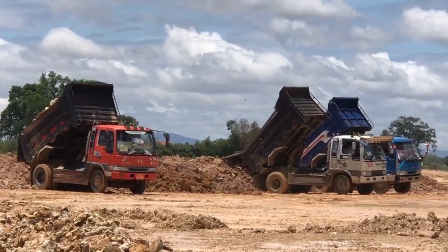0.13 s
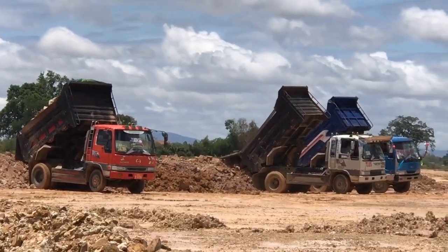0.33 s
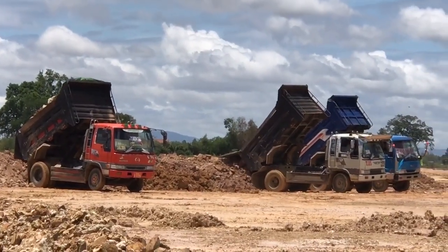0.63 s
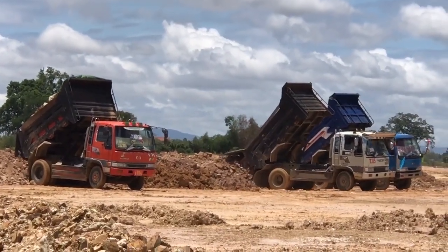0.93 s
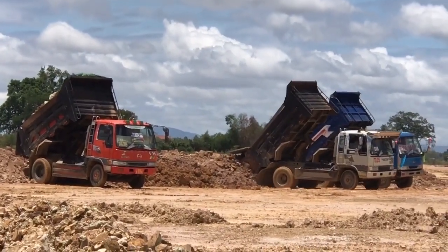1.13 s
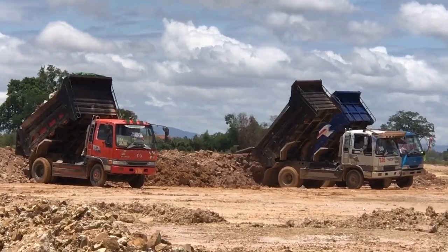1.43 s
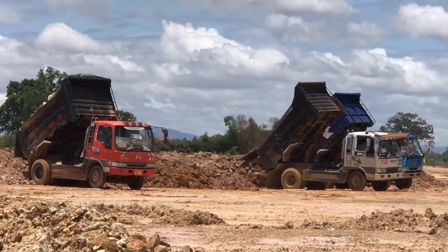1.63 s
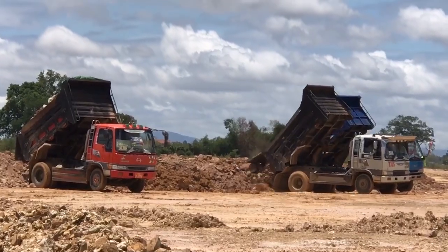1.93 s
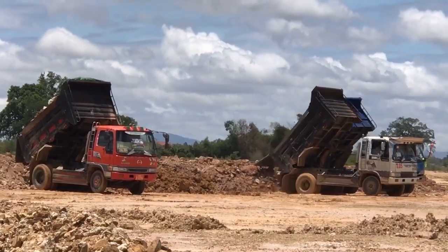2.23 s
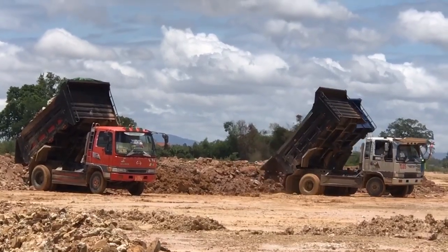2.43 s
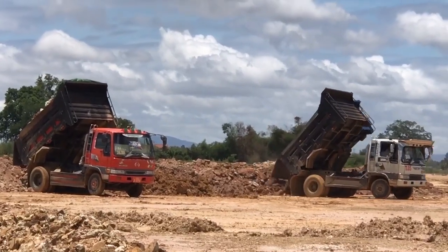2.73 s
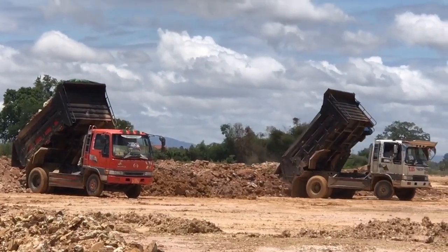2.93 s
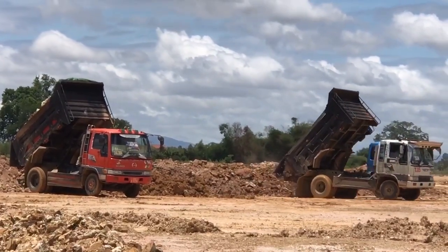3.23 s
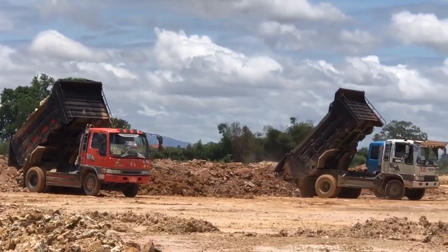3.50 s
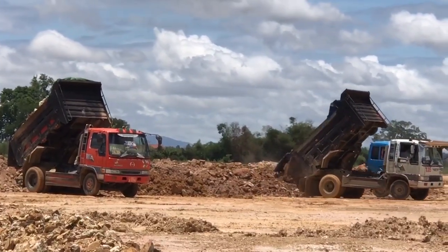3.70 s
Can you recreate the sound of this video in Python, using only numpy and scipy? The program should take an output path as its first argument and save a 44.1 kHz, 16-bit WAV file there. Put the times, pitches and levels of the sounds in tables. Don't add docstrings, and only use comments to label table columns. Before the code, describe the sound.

Heavy truck engines drone and pull away over dirt, brakes squeak, a steel bed clangs late

```python
import sys
import numpy as np
from scipy import signal
from scipy.fft import rfft, irfft, next_fast_len
from scipy.io import wavfile
from scipy.ndimage import uniform_filter1d

SR = 44100
rng = np.random.default_rng(int(sys.argv[2]) if len(sys.argv) > 2 else 0)


def generate_wav(sig):
    pcm = np.round(np.clip(np.atleast_2d(sig).T, -1, 1) * 32767).astype(np.int16)
    wavfile.write(sys.argv[1], SR, pcm)


def to_linear_factor(level_db):
    exponent = np.asarray(level_db, float) / 20
    return 10 ** exponent


N = 170226


def rms_one(x):
    return x / np.sqrt(np.mean(x ** 2) + 1e-20)


def in_time(rows):
    s, *columns = np.transpose(rows)
    return [np.interp(np.arange(N) / SR, s, c) for c in columns]


def at_hz(points, hz):
    table_hz, value = np.transpose(points)
    return np.interp(np.log(hz), np.log(table_hz), value)


def drift(rate_hz, count=N):
    r = np.exp(-80 * np.pi * rate_hz / SR)
    slow = signal.lfilter([1], [1, -2 * r, r * r], rng.standard_normal(N // 40 + 2002))[2000:]
    return np.interp(np.arange(count) / 40, np.arange(len(slow)), rms_one(slow))


def ring(x, hz, t60_s):
    r, w = to_linear_factor(-60 / (t60_s * SR)), 2 * np.pi * hz / SR
    return signal.lfilter([0, np.sin(w)], [1, -2 * r * np.cos(w), r * r], x + 1e-18)


def bandpass(x, low_hz, high_hz):
    return signal.sosfilt(signal.butter(2, [low_hz, high_hz], "band", fs=SR, output="sos"), x)


def bands(spectrum, sources):
    first_hz, last_hz = spectrum[0][0], min(spectrum[-1][0], 13000)
    edges = first_hz * 2 ** np.arange(0, np.log2(last_hz / first_hz) + .3, 1 / 3)
    for k, (low, high) in enumerate(zip(edges, np.minimum(edges[1:], .45 * SR))):
        hz = np.sqrt(low * high)
        yield hz, to_linear_factor(at_hz(spectrum, hz)) * bandpass(sources[k % 2], low, high)


def patchy(spectrum, sources, patchy_db):
    together = drift(5.3)
    total = np.zeros(N)
    for _, band in bands(spectrum, sources):
        total += band * to_linear_factor(patchy_db * (0.18 * together + drift(22.4)))
    return rms_one(total)


def engine(run, orders, wobble_db, jitter):
    in_step_s = 3.125
    hz, db = in_time(run)
    turn = 2 * np.pi * np.cumsum(hz * (1 + jitter * drift(4))) / SR
    turn = turn - turn[int(in_step_s * SR)]
    tones = np.zeros(N)
    for k, order_db in orders:
        height = to_linear_factor(order_db + wobble_db * min(k + .2, 2.5) * drift(5))
        tones += height * np.sin(k * turn + (k - 1) * rng.uniform(0, 2 * np.pi))
    return np.sqrt(2) * to_linear_factor(db) * tones, turn, db


def engines():
    # start_s, cycle_rate_hz, level_db
    idle_run = [(0, 11.42, -42), (.8, 11.51, -42), (1.6, 11.58, -42), (2.3, 11.56, -44), (3.86, 11.6, -45)]
    # multiple_of_cycle_rate, level_db
    idle_orders = [(5, -3), (6, -3), (10.5, -10), (12, -4), (14, -11), (15, -7), (18, -2), (22, -13),
                   (24, -10)]
    # start_s, firing_rate_hz, level_db
    first_run = [(0, 41.5, -41), (.4, 44.8, -37), (.75, 44.2, -38), (.95, 45.2, -33), (1.25, 48, -39),
                 (1.9, 49, -41), (2.3, 51.2, -35), (2.65, 51.9, -31), (2.85, 53.2, -33), (3.1, 53.8, -32),
                 (3.25, 54.7, -33), (3.4, 56.9, -33), (3.86, 58, -36)]
    # multiple_of_firing_rate, level_db
    first_orders = [(1, 0), (2, -15), (2.5, -9), (3, -16), (4, -22), (5, -21)]
    # start_s, firing_rate_hz, level_db
    second_run = [(0, 38, -60), (1.2, 38, -46), (1.6, 43.5, -42), (2.0, 47.8, -36), (2.3, 49.3, -42),
                  (2.6, 50.2, -40), (2.9, 50.8, -33), (3.86, 51.5, -32)]
    # multiple_of_firing_rate, level_db
    second_orders = [(1, 0), (1.5, -17), (2, -13), (2.5, -9), (3, -11), (3.5, -16), (5, -20)]
    # freq_hz, level_db
    roar_spectrum = [(28, -6), (45, 1), (70, 2.5), (130, 4), (220, 0), (310, -4), (390, -14.5), (480, -4),
                     (600, -36)]
    # freq_hz, level_db
    clatter_spectrum = [(250, -59), (400, -6), (600, 2), (900, 2.5), (1500, -8), (2300, -6.5), (3500, -17),
                        (6000, -23), (12000, -46.5)]
    roar_db, roar_follows = -37.5, 0.081
    clatter_db, clatter_depth = -38.5, 0.11

    idle, idle_turn, _ = engine(idle_run, idle_orders, wobble_db=1.1, jitter=.004)
    first, first_turn, _ = engine(first_run, first_orders, wobble_db=1.4, jitter=.002)
    second, _, load_db = engine(second_run, second_orders, wobble_db=1.3, jitter=.002)
    roar = patchy(roar_spectrum, rng.standard_normal((2, N)), patchy_db=1.0)
    roar *= to_linear_factor(roar_db + roar_follows * (load_db - load_db.mean()))
    throb = np.exp(clatter_depth * np.cos([3 * idle_turn, first_turn]))
    clatter = patchy(clatter_spectrum, throb * rng.standard_normal((2, N)), patchy_db=0.94)
    return idle + first + second + roar + to_linear_factor(clatter_db) * clatter


def soil():
    # start_s, level_db
    slide = [(0, -49.5), (.35, -51.5), (.58, -48), (.8, -47.5), (1.15, -44.5), (1.35, -41), (1.6, -42.5),
             (1.9, -42.5), (2.1, -45.5), (2.8, -47), (3.86, -50)]
    # freq_hz, level_db
    soil_spectrum = [(700, -14.5), (1500, 5), (2500, 2), (4000, -0.5), (6000, -8), (8500, -12),
                     (10500, -17), (12000, -54)]
    grains_per_s, grain_share = 700, .4
    sizes = to_linear_factor(1.6 * np.minimum(rng.exponential(1, N), 5)) * rng.choice([-1, 1], N)
    lands = rng.random(N) < grains_per_s * to_linear_factor(4 * drift(8)) / SR
    grains = rms_one(sizes * lands)
    hiss = patchy(soil_spectrum, rng.standard_normal((2, N)) + grain_share * grains, patchy_db=2.0)
    return to_linear_factor(in_time(slide)[0]) * hiss


def short_squeals():
    # start_s, length_s, pitch_hz, width_hz, level_db
    chirps = [(0.258, 0.073, 4530, 33, -58.5), (0.44, 0.045, 7520, 60, -60), (0.485, 0.055, 9800, 57, -57),
              (0.559, .17, 9925, 60, -52), (.71, .18, 9890, 60, -56), (.87, .12, 9900, 220, -54),
              (0.512, 0.08, 4550, 150, -51), (.522, .035, 5250, 60, -56), (0.541, 0.052, 2350, 220, -41),
              (.6, .09, 2250, 120, -51), (0.8, 0.08, 4740, 49, -47), (0.7, 0.035, 2620, 40, -47),
              (0.745, 0.07, 2552, 60, -51), (.82, 0.09, 2560, 60, -55), (0.94, 0.07, 2270, 80, -47),
              (3.484, 0.046, 6640, 8, -46), (3.654, 0.016, 1780, 30, -41), (3.515, 0.012, 1880, 46, -28),
              (3.509, .015, 8600, 200, -48)]
    edge_s, steady_share = .012, .9
    out = np.zeros(N)
    for s, length_s, hz, width_hz, db in chirps:
        i, n = int(s * SR), int(length_s * SR)
        t = np.arange(n) / SR
        gate = np.clip(np.minimum(t, length_s - t) / min(edge_s, length_s / 4), 0, 1)
        smear = steady_share + drift(width_hz, count=n) + 1j * drift(width_hz, count=n)
        out[i:i + n] += gate * to_linear_factor(db) * np.real(smear * np.exp(2j * np.pi * hz * t))
    return out


def thuds():
    # start_s, pitch_hz, level_db, t60_s
    blows = [
        (.3, 290, -36, .3),
        (1.05, 280, -37, .8),
        (1.92, 118, -31, .5),
        (1.95, 280, -36, .4),
        (2.38, 145, -33, .8),
        (3.517, 64, -20, .25),
        (3.5164, 171, -21, .5),
        (3.66, 165, -21, .2),
        (3.645, 262, -30, .2),
    ]
    rise_s = .008
    out = np.zeros(N)
    for s, hz, db, t60_s in blows:
        i = int(s * SR)
        t = np.arange(N - i) / SR
        out[i:] += to_linear_factor(db - 60 * t / t60_s) * np.minimum(t / rise_s, 1) * np.sin(2 * np.pi * hz * t)
    return out


def stone_ticks():
    # start_s, level_db, pitch_hz
    stones = [
        (.498, -45, 3300),
        (.5, -51, 7000),
        (3.518, -25, 2900),
        (1.068, -38, 3050),
        (1.587, -41, 7500),
        (3.486, -34, 5000),
    ]
    out = np.zeros(N)
    n = SR // 10
    for s, db, hz in stones:
        i = int(s * SR)
        burst = to_linear_factor(-60 * np.arange(n) / SR / .02) * rng.standard_normal(n)
        out[i:i + n] += 3 * to_linear_factor(db) * bandpass(burst, hz / 1.25, hz * 1.25)
    return out


def glide(run, width_hz, rough):
    hz, db = in_time(run)
    t = np.arange(N) / SR
    sounding = (t > run[0][0]) * (t < run[-1][0])
    smear = 1 + rough * (drift(width_hz) + 1j * drift(width_hz))
    return to_linear_factor(db) * sounding * np.real(smear * np.exp(2j * np.pi * np.cumsum(hz) / SR))


def brake_squeal():
    # start_s, pitch_hz, level_db
    squeal_run = [(.69, 4930, -70), (.705, 4850, -51), (.735, 4650, -46), (.775, 4690, -49),
                  (.8, 4930, -47), (.93, 4910, -48), (.95, 4560, -47), (1.0, 4640, -50), (1.04, 4750, -62)]
    return glide(squeal_run, width_hz=90, rough=.75)


def chassis_knock():
    start_s, length_s, pitch_hz, level_db = 2.1265, .007, 1250, -32
    t = np.arange(N) / SR - start_s
    gate = np.clip(t / length_s, .6, 1) * (t > 0) * (t < length_s)
    return 2 * to_linear_factor(level_db) * np.sin(2 * np.pi * pitch_hz * t) * gate


def bed_ring(slams):
    # freq_hz, level_db, t60_s
    modes = [(133.6, -4, 0.9), (194, -3, 0.45), (256.5, -4.5, 0.81), (278, -4.5, 0.6), (331.6, -5, 0.41),
             (521, -8, 0.56), (612, -6, 0.75), (859, -4, 0.4), (980, -4, .35), (1480, -11, .35),
             (1890, -3.5, 0.22), (2540, -12, .3), (2920, -15, .3), (3180, -16, 0.25)]
    bed_db, stagger_s = -2.5, .014
    out = np.zeros(N)
    strengths_db = rng.normal(0, 2, (len(slams), len(modes)))
    lags_s = rng.uniform(0, stagger_s, strengths_db.shape)
    for (s, _, db, scale), own_db, late_s in zip(slams, strengths_db, lags_s):
        for (hz, mode_db, t60_s), extra_db, lag_s in zip(modes, own_db, late_s):
            i = int((s + lag_s) * SR)
            click = np.arange(N - i) == 0
            out[i:] += to_linear_factor(db + bed_db + mode_db + extra_db) * ring(click, hz, t60_s * scale)
    return out


def crash(slams):
    # freq_hz, level_db
    crash_spectrum = [(100, -1), (250, -7), (450, -2.5), (900, 4), (1900, -6.5), (3000, -3), (6000, -12.5),
                      (10000, -18.5), (12000, -32)]
    # freq_hz, t60_s
    crash_t60 = [(100, 1), (1000, 0.42), (4000, 0.17), (12000, 0.07)]
    crash_db, rattle_per_s, rattle_share = 5.5, 350, .7
    rise_s, rise_growth = .003, .15
    late_dull_db_per_s = 30
    main_s = slams[3][0]
    start = int(slams[0][0] * SR) - 500
    out, t = np.zeros(N), np.arange(start, N) / SR
    white = rng.standard_normal((2, N - start))
    rattle = rms_one(rng.standard_normal(N - start) * (rng.random(N - start) < rattle_per_s / SR))
    noise = list(bands(crash_spectrum, white + rattle_share * rattle))
    whole = np.std(sum(band for _, band in noise))
    for hz, band in noise:
        dull_db_per_s = late_dull_db_per_s * max(np.log2(hz / 3000), 0)
        power = np.zeros(N - start)
        for s, db, _, scale in slams:
            rise = np.clip((t - s) / (rise_s + rise_growth * max(s - main_s, 0)), 0, 1)
            decay_db = 60 * np.maximum(t - s, 0) / (at_hz(crash_t60, hz) * scale)
            power += rise * to_linear_factor(db + crash_db - dull_db_per_s * (s - t[0]) - decay_db) ** 2
        out[start:] += band / whole * uniform_filter1d(np.sqrt(power), size=60)
    return out


def tailgate():
    # start_s, crash_db, bed_db, ring_down_scale
    contacts = [
        (3.488, -39, -65, 0.54),
        (3.497, -36.5, -33, 0.4),
        (3.508, -29, -34, 0.63),
        (3.516, -27, -26.5, 0.59),
        (3.526, -30, -27, 1.09),
        (3.55, -35.5, -32, 0.88),
        (3.575, -32, -32.5, 0.71),
        (3.605, -33.5, -37, 0.69),
        (3.656, -33, -45, .3),
        (3.665, -42, -36, 0.19),
    ]
    return bed_ring(contacts) + crash(contacts)


def bed_groan():
    # start_s, pitch_hz, level_db
    groan_run = [(3.5, 136.8, -60), (3.54, 136.3, -33), (3.62, 133.1, -35), (3.7, 127.4, -36),
                 (3.78, 111, -37), (3.86, 107, -27)]
    return glide(groan_run, width_hz=8, rough=.3)


def ground_echo(direct):
    delay_s, gain, blur_hz = .00065, .8, 2000
    size = next_fast_len(N + 100)
    hz = np.fft.rfftfreq(size, 1 / SR)
    ground = 1 + gain * np.exp(-(hz / blur_hz) ** 2 - 2j * np.pi * hz * delay_s)
    return irfft(rfft(direct, size) * ground / (1 + gain), size)[:N]


def scene():
    direct = engines() + soil() + short_squeals() + thuds() + stone_ticks()
    direct += brake_squeal() + chassis_knock() + tailgate() + bed_groan()
    return ground_echo(direct)[None]


def top_cut(x):
    return signal.sosfilt(signal.butter(12, 12080, fs=SR, output="sos"), x)


def record(dry):
    low_cut_hz = 43.5
    lost_from_s, lost_to_s, lost_fade_s, lost_above_hz = 0.544, 1, 0.033, 10030
    x = signal.sosfilt(signal.butter(4, low_cut_hz, "high", fs=SR, output="sos"), dry)
    t = np.arange(N) / SR
    lost = np.clip(np.minimum(t - lost_from_s, lost_to_s - t) / lost_fade_s, 0, 1)
    top = signal.sosfiltfilt(signal.butter(16, lost_above_hz, "high", fs=SR, output="sos"), x)
    return top_cut(x - lost * top)


dry = scene()
out = record(dry)
generate_wav(out)
```